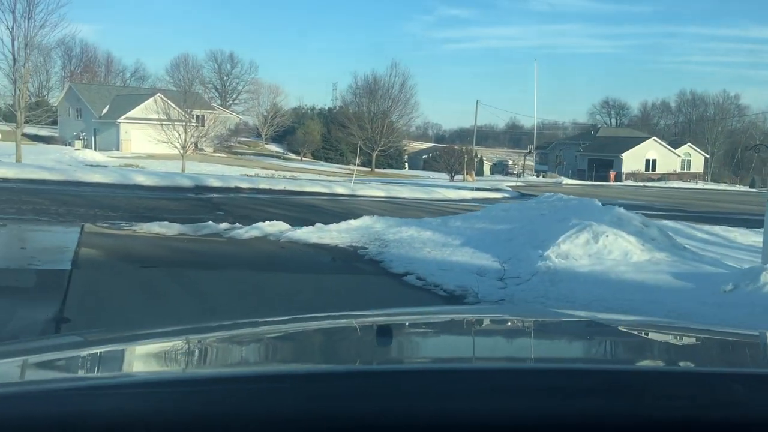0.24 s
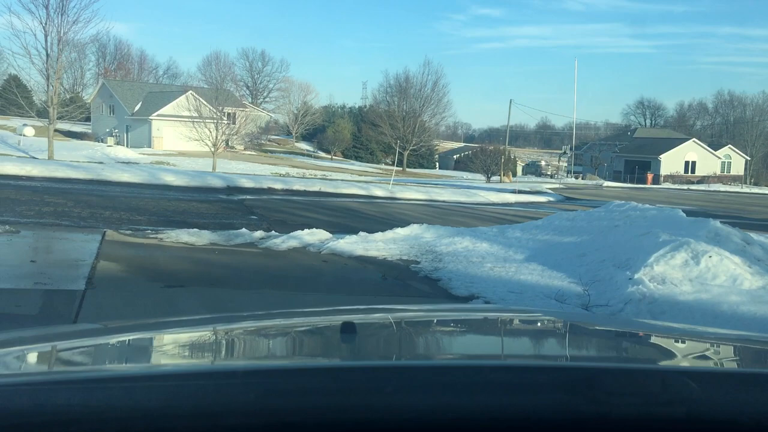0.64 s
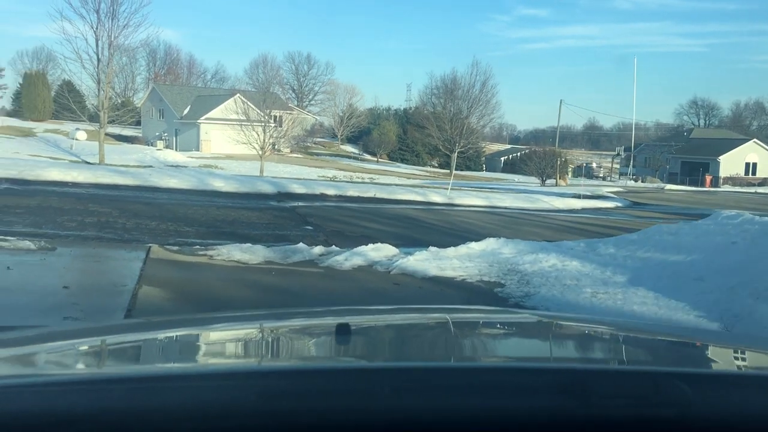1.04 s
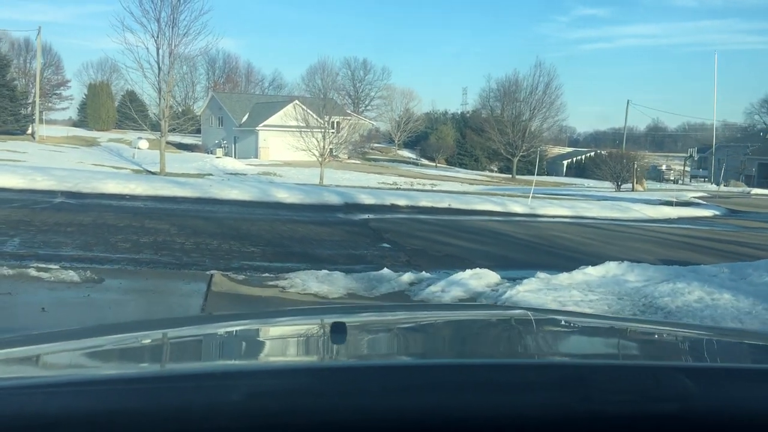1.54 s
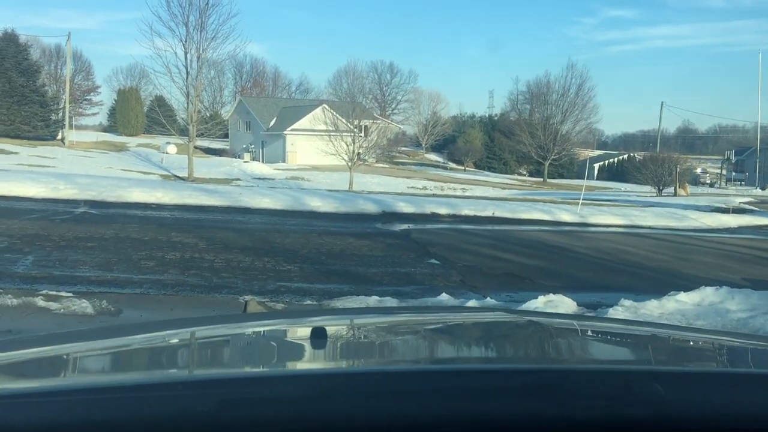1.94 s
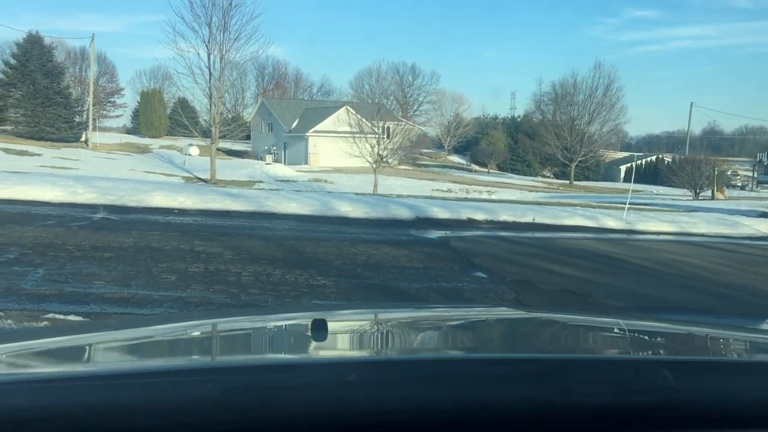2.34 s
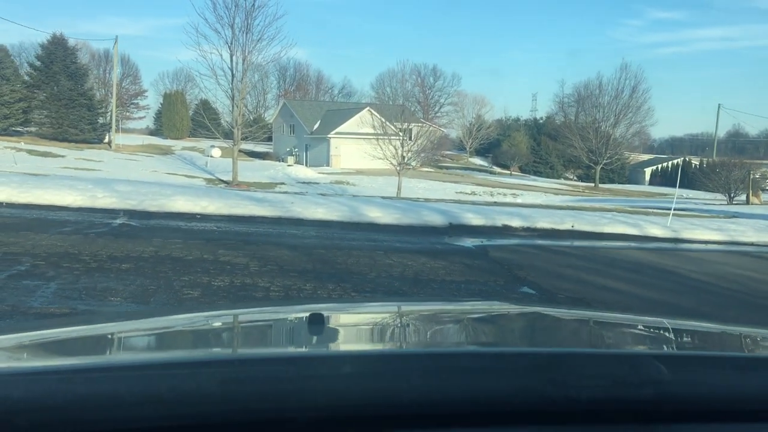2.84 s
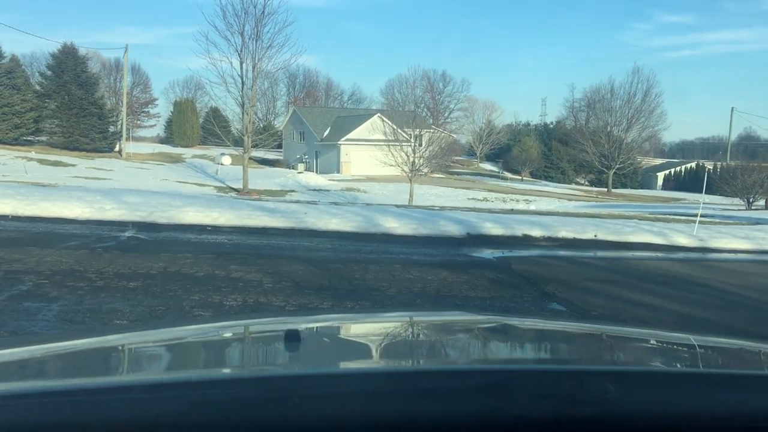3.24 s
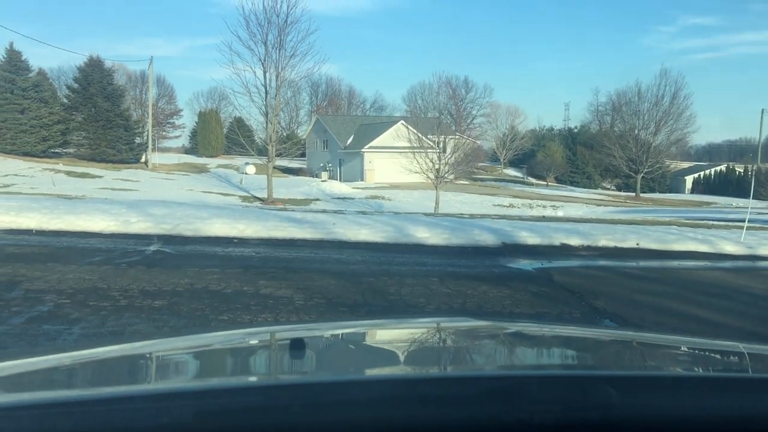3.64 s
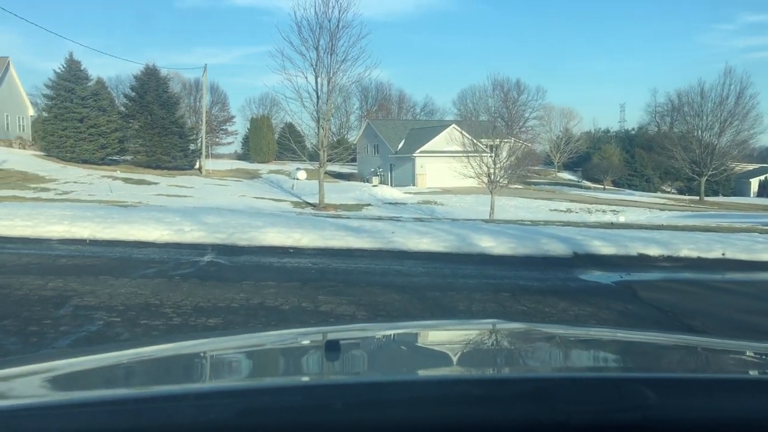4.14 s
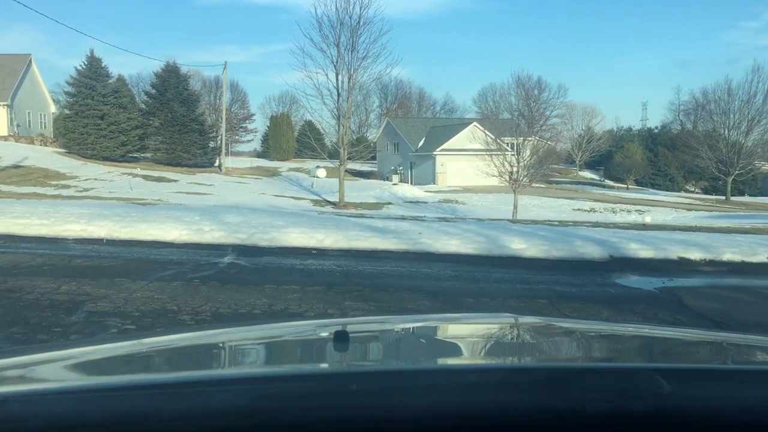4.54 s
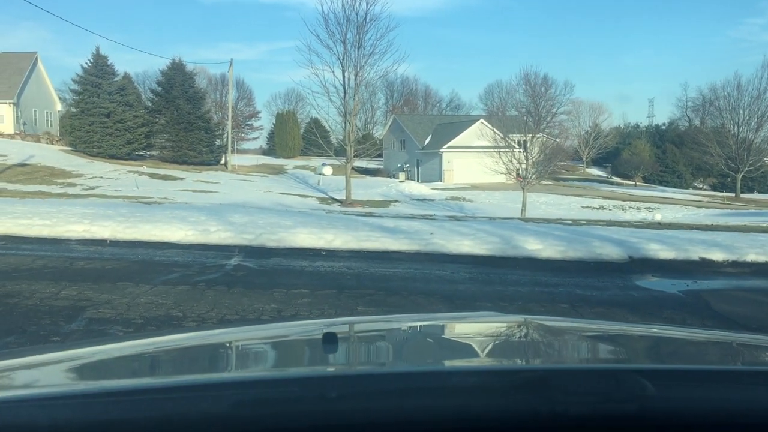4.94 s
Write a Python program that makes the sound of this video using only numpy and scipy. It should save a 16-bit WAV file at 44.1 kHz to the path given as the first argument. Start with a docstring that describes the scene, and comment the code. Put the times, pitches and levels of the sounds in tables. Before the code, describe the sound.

Inside a car, dragging brakes make a low booming shudder and rough muffled groans, swelling unevenly while the vehicle creeps out of a driveway.

```python
"""Worn brakes grind as a car rolls slowly out of a snowy driveway, heard from inside the closed cabin.
The pads slip on rough discs: dense random jolts, filtered by the body, make shudder, rumble and scrape.
The dragging sets the cabin booming, made of low tones that waver in pitch and level.
The pads groan on short wavering notes, and the discs ring faintly as narrow bands of filtered jolts.
Inside are soft brushing, faint air hiss, a thin whine, ticks of the trim and one tiny snap."""
import sys
import numpy as np
from scipy import signal
from scipy.fft import rfft, irfft, next_fast_len
from scipy.io import wavfile
from scipy.ndimage import uniform_filter1d

SR = 44100
rng = np.random.default_rng(int(sys.argv[2]) if len(sys.argv) > 2 else 0)


def inscribe(sig):
    """Save sig as 16-bit PCM at rate SR to the path in sys.argv[1].

    A 1-D sig is mono; a 2-D sig holds one channel per row.
    Samples are clipped to [-1, 1] before scaling.
    """
    pcm = np.round(np.clip(np.atleast_2d(sig).T, -1, 1) * 32767)
    wavfile.write(sys.argv[1], SR, pcm.astype(np.int16))


N = 228734  # samples, about 5.2 s
TIME_S = np.arange(N) / SR
FFT_SIZE = next_fast_len(N)
FREQ_HZ = np.maximum(np.arange(FFT_SIZE // 2 + 1) * SR / FFT_SIZE, 1)

# Faint steady hiss of the cabin: pitch_hz, gain_db
AIR_COLOUR = [(1000, 1), (2500, 1), (3400, -2), (4200, -2), (5000, -5), (9000, -6.5), (10500, -7.5),
              (15500, -8)]
AIR_DB = -73
WHINE_HZ, WHINE_DB = 10864, -97.5  # thin electrical whine
# Soft brushing, like a hand sliding on the steering wheel: time_s, level_db
BRUSH_LEVEL = [(0, -63), (.06, -62), (.16, -79.5), (.5, -79.5), (1.2, -81), (1.34, -77), (1.46, -69.5),
               (1.74, -72), (1.92, -66), (2.0, -67.5), (2.08, -87.5), (4.3, -90.5), (4.5, -72),
               (4.66, -85.5), (5.19, -90)]
# Tone of the brushing: pitch_hz, gain_db
BRUSH_COLOUR = [(2000, -14.5), (4000, 0), (4800, -1.5), (5800, 0.5), (9000, -1.5), (10500, -5),
                (12000, -4.5), (15500, -8.5)]

# Small ticks in the cabin: start_s, level_db, centre_hz, nominal_width_hz, time_to_fade_60_db_s
TICKS = [(0.415, -57, 4930, 2400, 0.069), (1.2993, -57, 5100, 2400, 0.047), (1.368, -60, 5460, 6000, 0.066),
         (1.385, -59, 4970, 5000, 0.06), (3.0629, -63.5, 5500, 6000, 0.054),
         (3.0989, -63, 4800, 4000, 0.098), (3.1247, -55.5, 4400, 3500, 0.032),
         (4.495, -60, 4400, 3000, 0.11), (4.505, -57, 7950, 7000, 0.033)]
TRIM_HZ, TRIM_WIDTH_HZ, TRIM_DB = 5400, 85, -4  # ring of the plastic trim
SNAP_S, SNAP_HZ, SNAP_LENGTH_S, SNAP_DB = 2.2145, 8350, 0.00019, -34  # one tiny snap of the trim

# Lower ring of the discs: pitch_hz, width_hz, height_db
DISC_LOWER = [(1858, 68, 0)]
# Upper ring, a close pair: pitch_hz, width_hz, height_db
DISC_UPPER = [(1980, 26, -1.1), (2077, 65, 0.084)]
# Spells in which a disc rings out: start_s, end_s, lower_ring_db, upper_ring_db
RINGS = [(0.543, 0.9, -73, -74.5), (1.12, 1.5, -75, -68.5), (1.703, 1.88, -86, -65.5),
         (1.968, 2.65, -73.5, -77.5), (2.968, 3.3, -74, -70), (3.29, 4.03, -73, -76.5),
         (4.12, 4.48, -80.5, -71), (4.685, 5.05, -78, -85)]
RING_EDGE_S = 0.06  # time to swell and to fade
LOWER_REST_DB, UPPER_REST_DB = -79.5, -79  # faint ringing between the spells

# Pad catching on one note, low groans and faint squeaks: middle_s, half_length_s, pitch_hz, level_db
GROANS = [(0.057, 0.091, 196, -41), (.12, 0.1, 2670, -72), (0.655, 0.043, 400, -42),
          (0.739, 0.13, 844, -55.5), (0.747, 0.1, 1624, -65.5), (0.778, 0.15, 197, -38),
          (1.07, 0.07, 3970, -75), (1.2, 0.1, 4000, -81), (1.333, 0.15, 344, -42.5),
          (1.39, 0.18, 233.6, -33.5), (1.916, 0.11, 469.7, -41.5), (2.343, 0.28, 248.4, -35.5),
          (2.717, 0.12, 474, -46.5), (3.726, 0.13, 838, -56), (3.904, 0.43, 1358, -66.5),
          (4.868, 0.077, 316.3, -40), (5.096, 0.021, 6090, -77)]

# How hard the pads drag on the discs: time_s, level_db (0 is full drag)
DRAG = [(0, -11), (0.4, -13.5), (0.72, -8), (0.9, -9.5), (1.05, -16.5), (1.12, -3), (1.24, -1.5), (1.8, -2),
        (2.0, -0.5), (2.45, -5), (2.9, -8), (3.2, -7.0), (3.58, -6), (3.75, -7.5), (3.98, -7), (4.5, -7),
        (4.68, -8), (5.15, -9.5)]
# How hard the body shakes, most as the car rolls off the driveway: time_s, level_db (0 is full shake)
SHAKE = [(0, -14.5), (0.4, -12), (1.05, -14.5), (1.25, -10), (1.55, -12.5), (1.98, -9.5), (2.2, -1.5),
         (2.42, -3), (2.6, -3.5), (2.8, -0.5), (3.15, -15.5), (3.55, -14), (4.0, -11.0), (4.3, -8),
         (4.7, -10.0), (5.15, -10.5)]

# Cabin resonances that boom: pitch_hz, wander_hz (at looseness 1), level_db (at full shake and drag),
# db_per_db_of_shake, db_per_db_of_drag, drift_db_per_s
BOOM_MODES = [(80.67, 3.304, -19.5, 1.16, 0, -0.22), (117.5, 2.5, -28, 1, 0.52, 0.67),
              (171.7, 2.2, -33.5, 1.47, 0.15, -0.05)]
# Surges of the boom: middle_s, half_length_s, lowest_db, second_db, third_db (one per resonance)
SURGES = [(0.12, 0.034, 7, 2, 11), (0.42, 0.05, 5, -0.5, -1), (1.35, 0.084, -0.5, 6.5, 1.5),
          (1.808, 0.03, 8, 4.5, 1.5), (2.13, 0.015, 5, -2.5, -4), (2.55, 0.11, -8, 6, 4),
          (2.74, 0.051, 4.5, 3.5, 0.5), (2.93, 0.08, 2, 0, 8.5), (3.35, 0.045, 7, 5.5, -2.5),
          (3.8, 0.1, 7.5, -2, -1), (4.03, 0.08, -2.5, -7.5, 8), (4.201, 0.053, 5.5, -3, 2.5),
          (4.34, 0.049, 4, 6, -2), (4.49, 0.044, 6.5, -6.5, -1), (4.68, 0.1, -5.5, 7, 0.5),
          (4.92, 0.027, 10, -1, 5)]
LOOSE_DB = 13  # this far below its strongest drive, a resonance has looseness 1
BOOM_FLUTTER_DB = 2.0  # at looseness 1

# Resonances of the body panels and cabin air: pitch_hz, width_hz, height_db (over the broad response)
BODY = [(43.4, 4, 6.5), (197, 14.2, 9.5), (276.4, 13, 9), (318.4, 9.8, 11), (391, 45, 7.5), (475.4, 14, 15),
        (475.5, 7.3, 8), (540, 36, 10), (610.4, 10, 15), (725, 17, 7), (823.5, 27, 13), (839, 24, 9),
        (912, 25, 10), (954, 59, 2), (1081, 59, 9), (1161, 28, 11.5), (1283.4, 9, 19), (1349, 23, 11),
        (1455, 20, 11.5), (1579, 31, 8.5), (1700, 40, 5), (2440, 28, 5), (2740, 30, 4)]
# Broad responses from wheel to cabin, one per layer: pitch_hz, gain_db
SHUDDER_COLOUR = [(12, -36.5), (25, -22.5), (40, -5.5), (66, -1.5), (100, -2.5), (140, -11.5), (200, -36.5)]
RUMBLE_COLOUR = [(70, -23.5), (105, 7), (158, -8.5), (205, 0), (300, -5.5), (360, -16), (450, -31),
                 (700, -60)]
GRIND_COLOUR = [(280, -27.5), (400, -0.5), (500, -1.5), (580, -10), (700, -9.5), (850, -27)]
RASP_COLOUR = [(580, -18.5), (720, 0.5), (900, 1), (1080, -3.5), (1200, -17), (1500, -35)]
SCRAPE_COLOUR = [(950, -22), (1250, 1), (1400, 0), (1700, -3.5), (2200, -6.5), (2700, -13), (3500, -19),
                 (6000, -45)]
# Layer levels; shake drives the shudder, drag the rest: full_drive_db, db_per_db_of_drive, drift_db_per_s
SHUDDER_LAW = (-25.5, 0.79, 0.3)
RUMBLE_LAW = (-32, 1.24, 0.7)
GRIND_LAW = (-42.5, 0.81, -0.59)
RASP_LAW = (-52, 0.94, .2)
SCRAPE_LAW = (-58.5, 0.27, -1.78)
# Rough patches passing under the pads: middle_s, half_length_s, rumble_db, grind_db, rasp_db
PATCHES = [(0.7, 0.051, -1, 5, 0.5), (1.42, 0.041, 1, 3, 1), (1.99, 0.05, -0.5, 3, -2.5),
           (2.15, 0.19, -1.5, 1.5, 2.5), (3.18, 0.045, 4, -0.5, -1.5), (3.41, 0.024, 4.5, 2, 3),
           (3.57, 0.033, 4.5, 5.5, 3.5), (3.97, 0.09, -1, 1.5, 7), (4.31, 0.03, 3, -0.5, 0),
           (4.68, 0.017, 6.5, 9, 5)]
# The wheels drop off the driveway: middle_s, half_length_s, extra_shudder_db
BUMPS = [(2.24, 0.044, 4), (2.42, .035, 8.5)]
JUDDER_HZ, JUDDER_DB = 11, 1.0  # the grip wavers, shared by all layers driven by drag

TOP_HZ = 15700  # little treble is left above this


def undb(db):
    """Turn decibels into gain."""
    return 10 ** (np.asarray(db) / 20)


def unit(x):
    """Scale to an average (rms) level of 1."""
    return x / np.sqrt(np.mean(x ** 2))


def curves(table):
    """Draw each column of a table as a value per sample."""
    time_s, *columns = np.transpose(table)
    return [np.interp(TIME_S, time_s, column) for column in columns]


def swells(table):
    """Add up smooth bell-shaped swells: one level curve per dB column."""
    return sum(np.outer(levels_db, np.exp(-((TIME_S - middle_s) / length_s) ** 2))
               for middle_s, length_s, *levels_db in table)


def colour(points):
    """Gain at each frequency through the points, falling away outside them."""
    hz, db = np.transpose(points)
    ends = np.minimum(FREQ_HZ / hz[0], 1) ** 2 * np.minimum(hz[-1] / FREQ_HZ, 1) ** 3
    return undb(np.interp(np.log(FREQ_HZ), np.log(hz), db)) * ends


def resonance(hz, width_hz):
    """Response of one damped resonance, with gain 1 at its centre."""
    return 1 / (1 + 1j * (FREQ_HZ ** 2 - hz ** 2) / (FREQ_HZ * width_hz))


def ringing(modes):
    """Gain of a flat response with resonances standing out of it."""
    return np.sqrt(1 + sum(np.abs(undb(db) * resonance(hz, width_hz)) ** 2 for hz, width_hz, db in modes))


def through(x, response):
    """Filter a sound by a response, then scale to rms 1."""
    return unit(irfft(rfft(x, FFT_SIZE) * response, FFT_SIZE)[:N])


def walk(rate_hz):
    """Smooth random curve that changes about rate_hz times a second, with spread 1."""
    return through(rng.standard_normal(N), np.exp(-(FREQ_HZ / rate_hz) ** 2))


def slips(per_second, patchy_db):
    """Tiny stick-slip jolts of uneven size, stronger in patches where the disc is rusty."""
    jolts = (rng.random(N) < per_second / SR) * rng.standard_normal(N)
    return jolts * undb(patchy_db * walk(32))


def steady(x, seconds):
    """Hold a sound's short-term level near 1."""
    power = uniform_filter1d(x ** 2, max(int(seconds * SR), 2), mode="reflect")
    return x / np.sqrt(np.abs(power) + 0.02)  # the small number limits the boost of quiet parts


def driven(law, drive_db):
    """Gain of a layer that grows with its drive and drifts as the car rolls on."""
    full_db, slope, drift_db_per_s = law
    return undb(full_db + slope * drive_db + drift_db_per_s * TIME_S)


def hiss():
    """Fine-grained brushing over the steady air noise and thin whine of the cabin."""
    brush_db, = curves(BRUSH_LEVEL)
    brush = through(slips(22000, 0.5), colour(BRUSH_COLOUR))
    air = through(rng.standard_normal(N), colour(AIR_COLOUR))
    whine = np.sqrt(2) * np.sin(2 * np.pi * WHINE_HZ * TIME_S)
    return brush * undb(brush_db) + air * undb(AIR_DB) + whine * undb(WHINE_DB)


def ticks():
    """Each tick is a bright, quickly fading burst of noise that rings the trim."""
    spectrum = 0
    trim = 1 + undb(TRIM_DB) * resonance(TRIM_HZ, TRIM_WIDTH_HZ)
    for start_s, db, hz, width_hz, t60_s in TICKS:
        fade = np.exp(-np.log(1000) * np.clip((TIME_S - start_s) / t60_s, 0, 10))
        burst = (TIME_S >= start_s) * fade * rng.standard_normal(N)
        response = trim * resonance(hz, width_hz * np.sqrt(2)) ** 2
        response = response / np.sqrt(np.mean(np.abs(response) ** 2))
        spectrum = spectrum + undb(db) * rfft(burst, FFT_SIZE) * response
    return irfft(spectrum, FFT_SIZE)[:N]


def snap():
    """The trim snaps: a click only a few cycles long."""
    age_s = TIME_S - SNAP_S
    swell = np.exp(-(age_s / SNAP_LENGTH_S) ** 2)
    return undb(SNAP_DB) * swell * np.sin(2 * np.pi * SNAP_HZ * age_s)


def disc_ring(modes):
    """Slips shake a metal disc, which answers in narrow bands around its own notes."""
    out = 0
    for hz, width_hz, db in modes:
        band = through(slips(8000, 0.63), np.abs(resonance(hz, width_hz)) ** 2)
        out = out + undb(db) * band * np.sqrt(width_hz)  # a wider band carries more power
    return unit(out)


def discs():
    """The lower and upper rings of the discs swell and fade by turns."""
    lower, upper = disc_ring(DISC_LOWER), disc_ring(DISC_UPPER)
    lower_gain, upper_gain = undb(LOWER_REST_DB), undb(UPPER_REST_DB)
    for start_s, end_s, lower_db, upper_db in RINGS:
        inside_s = np.minimum(TIME_S - start_s, end_s - TIME_S)
        spell = np.clip(inside_s / RING_EDGE_S + 0.5, 0, 1)
        lower_gain = np.maximum(lower_gain, spell * undb(lower_db))
        upper_gain = np.maximum(upper_gain, spell * undb(upper_db))
    return lower * lower_gain + upper * upper_gain


def groans(wander=0.013):
    """For a moment a pad locks onto one note, wavering by a fraction of its pitch."""
    out = 0
    slow, fast = walk(12.1), 1.7 * walk(110)
    flutter_db = 2.2 * walk(35)
    for middle_s, length_s, hz, db in GROANS:
        waver = slow if hz < 1000 else fast  # high notes waver faster and wider
        phase = 2 * np.pi * np.cumsum(hz * (1 + wander * waver)) / SR
        swell = np.exp(-((TIME_S - middle_s) / length_s) ** 2)
        out = out + undb(db + flutter_db) * swell * np.sin(phase)
    return out


def boom():
    """The dragging pads keep low resonances sounding; the stronger the drive, the steadier the tone."""
    (shake_db,), (drag_db,) = curves(SHAKE), curves(DRAG)
    out = 0
    for mode, surge_db in zip(BOOM_MODES, swells(SURGES)):
        hz, wander_hz, db, per_shake, per_drag, drift_db_per_s = mode
        drive_db = per_shake * shake_db + per_drag * drag_db + drift_db_per_s * TIME_S + surge_db
        looseness = np.clip((drive_db.max() - drive_db) / LOOSE_DB, 0.25, 1.6)
        pitch_hz = hz + wander_hz * looseness * walk(23.9)
        phase = 2 * np.pi * np.cumsum(pitch_hz) / SR
        flutter_db = BOOM_FLUTTER_DB * looseness * walk(14)
        out = out + undb(drive_db + db + flutter_db) * np.sqrt(2) * np.sin(phase)
    return out


def brakes():
    """Slips travel up the suspension into the body, from a deep shudder to a thin scrape."""
    (shake_db,), (drag_db,) = curves(SHAKE), curves(DRAG)
    drag_db = drag_db + JUDDER_DB * walk(JUDDER_HZ)
    bump, = undb(swells(BUMPS))
    rumble_patch, grind_patch, rasp_patch = undb(swells(PATCHES))
    body = ringing(BODY)

    shudder = steady(through(slips(3000, 0.54), body * colour(SHUDDER_COLOUR)), 0.1) * bump
    rumble = steady(through(slips(3000, 0.43), body * colour(RUMBLE_COLOUR)), 0.09) * rumble_patch
    grind = steady(through(slips(5000, 0.88), body * colour(GRIND_COLOUR)), 0.12) * grind_patch
    rasp = steady(through(slips(6000, 1.0), body * colour(RASP_COLOUR)), 0.12) * rasp_patch
    scrape = through(slips(9000, 2.2), body * colour(SCRAPE_COLOUR))  # left uneven

    out = shudder * driven(SHUDDER_LAW, shake_db)
    out = out + rumble * driven(RUMBLE_LAW, drag_db)
    out = out + grind * driven(GRIND_LAW, drag_db)
    out = out + rasp * driven(RASP_LAW, drag_db)
    return out + scrape * driven(SCRAPE_LAW, drag_db)


def scene():
    """Everything as it reaches the front seat, in one channel."""
    cabin = hiss() + ticks() + snap()
    car = discs() + groans() + boom() + brakes()
    return (cabin + car)[None]


def record(dry):
    """A steep low-pass filter cuts the top of the treble."""
    low_pass = signal.ellip(10, 0.1, 80, TOP_HZ, fs=SR, output="sos")
    return signal.sosfilt(low_pass, dry)


dry = scene()
out = record(dry)
inscribe(out)
```